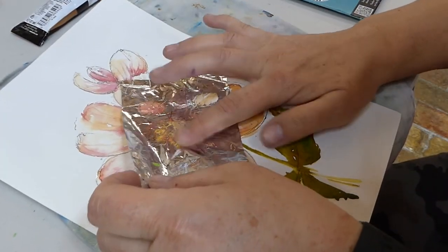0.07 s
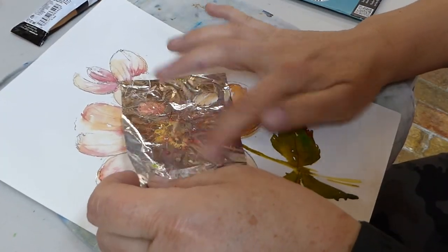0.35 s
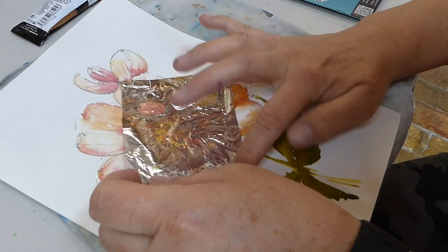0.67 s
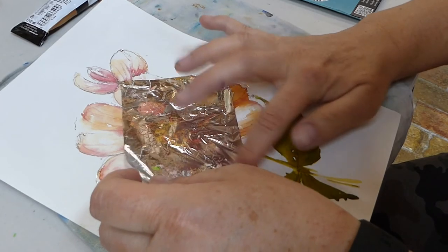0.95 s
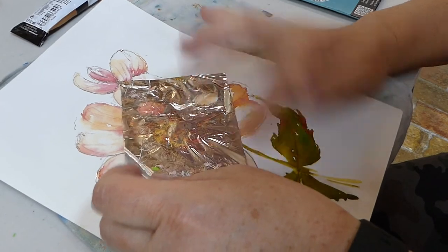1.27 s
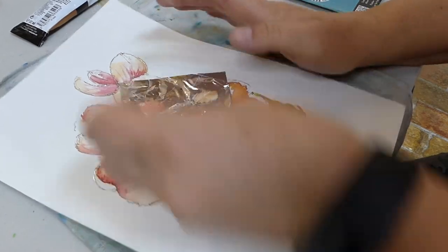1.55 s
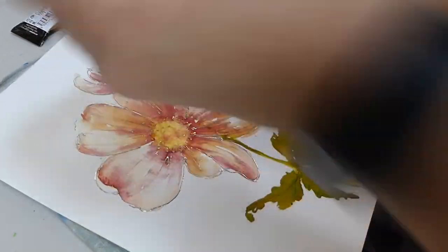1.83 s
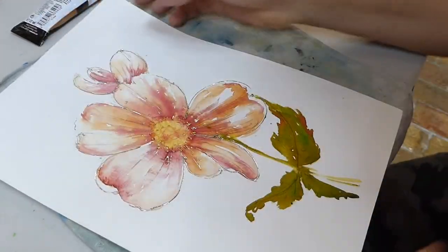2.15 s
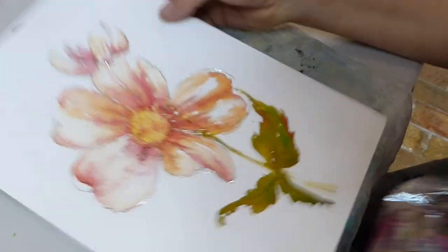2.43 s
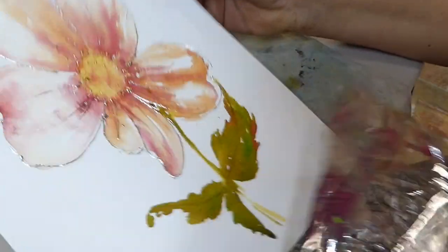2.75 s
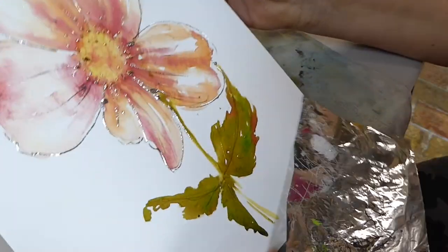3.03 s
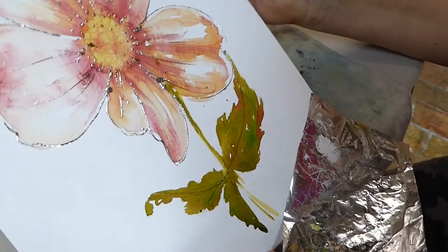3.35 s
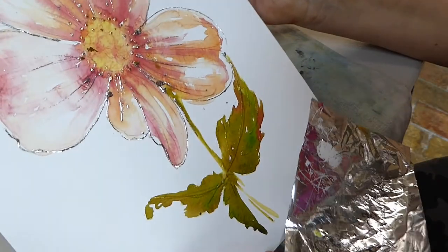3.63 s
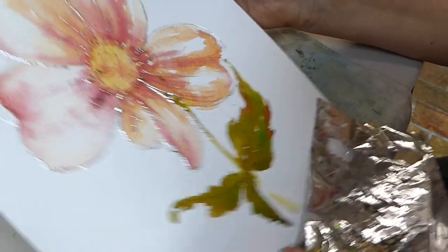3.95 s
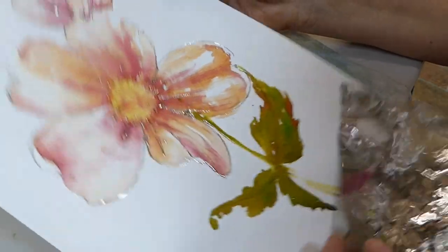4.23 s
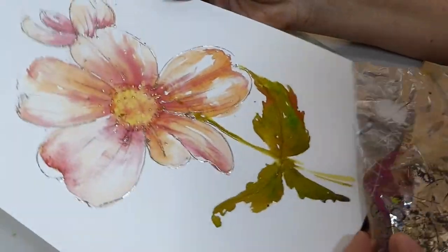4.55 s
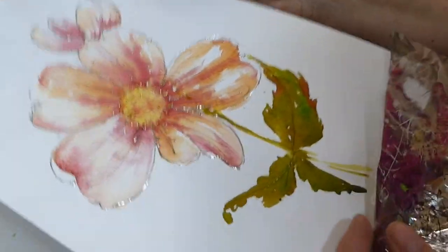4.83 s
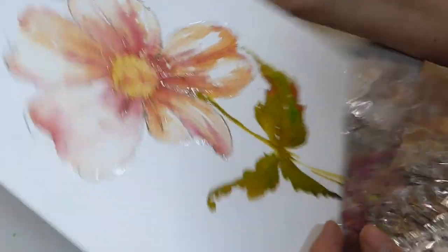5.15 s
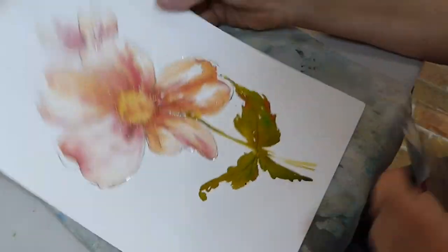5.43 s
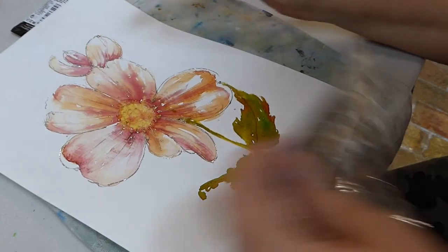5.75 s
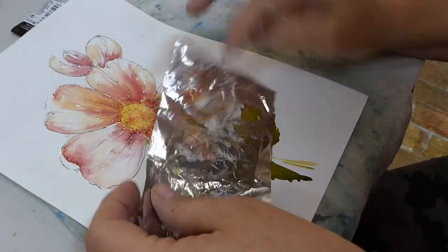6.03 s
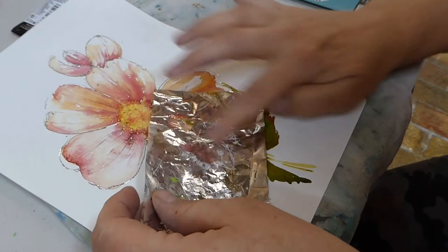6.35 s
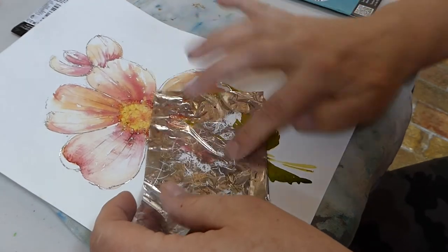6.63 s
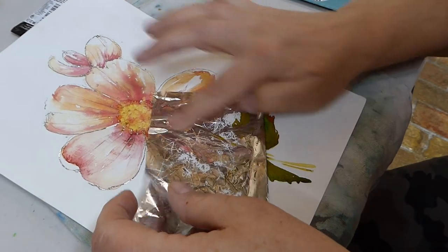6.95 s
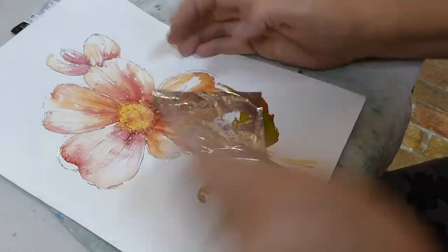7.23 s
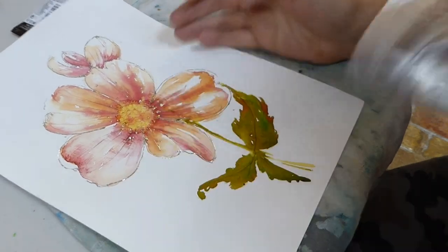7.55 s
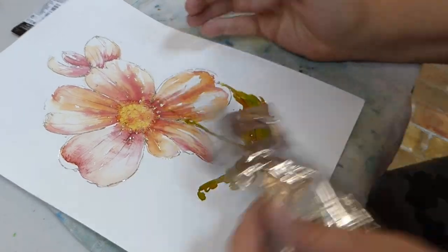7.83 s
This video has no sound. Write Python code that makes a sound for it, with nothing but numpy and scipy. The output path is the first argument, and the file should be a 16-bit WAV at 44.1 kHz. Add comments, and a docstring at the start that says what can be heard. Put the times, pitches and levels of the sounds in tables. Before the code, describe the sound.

Close to the microphone in a small quiet room, thin foil crackles in fits under a rubbing finger, then comes away in a loud, bright crinkle. Stiff paper scrapes across the desk with a few dull knocks while the held foil ticks faintly. The foil is then pressed down again, crackling, and lifted with another burst of crinkling. Occasional soft hand thumps sound on the desk.

```python
"""A fingertip presses thin metal foil onto paper, close by on a desk in a small quiet room.
The finger rubs, and the foil's creases buckle in showers of tiny clicks and a few sharp snaps.
At about 1.6 s the foil is peeled off, then held while the paper slides and knocks on the desk.
From about 5 s it is laid down and rubbed flat again, and after 7 s it is peeled off once more.
Now and then a hand bumps the desk."""
import sys
import numpy as np
from scipy import signal
from scipy.fft import rfft, irfft, next_fast_len
from scipy.io import wavfile
from scipy.ndimage import uniform_filter1d, map_coordinates

SR = 44100
rng = np.random.default_rng(int(sys.argv[2]) if len(sys.argv) > 2 else 0)


def to_wav(sig):
    """Store sig (one row per channel, or 1-D mono) as 16-bit WAV at the path in sys.argv[1].

    Samples outside -1..1 are clipped; the rate is SR.
    """
    pcm = np.clip(np.atleast_2d(sig), -1, 1) * 32767
    pcm = np.round(pcm).astype(np.int16)
    wavfile.write(sys.argv[1], SR, pcm.T)  # frames by channels


N = 352359

# Levels in all tables are relative. Fine creases make the foil's treble, broad facets its body.
# the foil peeled off or swung through the air, one table per lift: t/s, creases/dB, facets/dB
FOIL_LIFTS = [
    [(1.56, -42, -45), (1.6, -29.5, -28.5), (1.684, -24.5, -27.5), (1.795, -41, -44), (1.82, -32.5, -35),
     (1.885, -52.5, -56)],
    [(2.015, -63, -55), (2.036, -31, -31), (2.14, -32, -33), (2.18, -41.5, -47), (2.203, -37.5, -40),
     (2.23, -47.5, -52.5), (2.275, -51, -52)],
    [(7.17, -58, -58.5), (7.25, -32.5, -36), (7.273, -40, -36), (7.335, -27.5, -30), (7.53, -43, -47.5),
     (7.575, -62.5, -61)],
    [(7.61, -57.5, -59), (7.648, -47.5, -49), (7.668, -25.5, -30), (7.745, -46, -47), (7.82, -51, -57)],
]
# the foil merely held: creases/dB, facets/dB
HELD_STILL_DB = (-66.5, -63)


def foil(crinkle_db=2, snap_db=1, split_hz=6000):
    """Buckling foil crinkles and snaps: creases are heard above split_hz, facets (flat patches) below."""
    # the loudest single creases popping through: t/s, creases/dB, facets/dB
    big_snaps = [(0.1246, -31.5, -48), (0.1587, -38, -58), (0.1858, -27, -57), (0.2706, -28, -35),
                 (0.4686, -37, -59), (0.298, -38, -54), (0.372, -44.5, -55), (0.5026, -46, -54),
                 (0.574, -41, -51), (0.671, -40, -58), (0.9128, -38, -41), (0.9214, -42, -44),
                 (1.013, -39, -35), (1.0942, -37, -33), (1.1132, -38, -42.5), (1.1608, -46, -53),
                 (1.2741, -39, -38), (1.3166, -34, -40), (1.4743, -27, -32), (1.9805, -38, -35),
                 (1.3524, -24, -36), (1.501, -34, -36), (1.5695, -29, -30), (1.5948, -23, -17),
                 (1.709, -25, -28), (1.7586, -29.5, -24.5), (1.9407, -49, -36.5), (1.9872, -19.5, -21),
                 (2.2887, -42, -39), (2.8296, -40, -40), (3.013, -47.5, -51), (3.166, -46, -58),
                 (3.209, -42.5, -47), (3.2307, -51, -46.5), (3.6027, -43, -52), (3.66, -53, -60),
                 (4.3915, -43, -54), (4.7525, -34.5, -38), (4.9332, -36, -31), (5.0968, -56, -48),
                 (5.1942, -35.5, -40), (5.2549, -36.5, -40), (5.3248, -32, -35), (5.708, -38, -56),
                 (5.779, -41, -56), (5.8142, -45, -38), (5.863, -42, -40), (5.9313, -29, -42),
                 (6.1248, -36.5, -40), (6.194, -38.5, -49.5), (6.2567, -31, -35), (6.3669, -41, -47.5),
                 (6.5033, -34.5, -53), (6.5284, -32, -39.5), (6.9519, -34.5, -46), (6.998, -41, -56),
                 (7.174, -56, -41.5), (7.2783, -26, -34), (7.3461, -25, -23), (7.432, -30, -36),
                 (7.7259, -26, -30.5), (7.9385, -35, -47), (7.9606, -27, -49)]
    # the foil's tone colour: f/Hz, level/dB
    colour = [(40, -29), (90, -19.5), (170, -10), (400, -5.5), (750, -3), (1200, -3.5), (1700, -4),
              (3300, -1), (5500, -3), (7800, -6.5), (9600, -2), (12500, -6.5), (15300, -11), (16500, -37)]
    flex_db = flexing()
    start_s, *levels_db = np.vstack([big_snaps, small_snaps(flex_db)]).T
    pops = buckles(len(start_s), crack_t60=.005, shiver=.24, shiver_t60=.022, ring=.3, ring_t60=.003)
    pops *= np.sqrt(.004 * SR)  # as much energy as 4 ms at level 1
    snaps = np.array([placed(start_s * SR, amp(db + snap_db)[:, None] * pops) for db in levels_db])
    snaps = filtered(snaps, lambda hz: 1j * hz / (700 + 1j * hz))  # a small facet gives little bass
    fine, broad = amp(flex_db + crinkle_db) * crinkling(flex_db[0]) + snaps
    blend = fine + filtered(broad - fine, lambda hz: 1 / (1 + (hz / split_hz) ** 4))
    return coloured(blend, colour)


def flexing(fits_db=1.5, fits_rate=45, bend_edge_db=11, tug_attack_s=0.013):
    """How hard the foil is worked, in dB for creases and facets; under a finger it gives way in fits."""
    # slow bends that swell and relax: middle/s, length/s, creases/dB, facets/dB
    bends = [(0.053, .12, -42.5, -49.5), (0.224, 0.13, -37.5, -40), (0.402, 0.08, -45, -51),
             (0.525, 0.23, -54.5, -56), (0.629, .12, -42.5, -41), (0.815, 0.087, -44, -44),
             (1.004, 0.11, -45.5, -45), (1.098, 0.15, -55, -51), (1.399, 0.096, -38, -38.5),
             (1.463, 0.06, -34, -36), (1.528, 0.074, -44, -43), (1.983, 0.032, -37, -35.5),
             (2.495, .11, -38.5, -43), (4.276, 0.13, -58.5, -56.5), (4.685, .15, -59.5, -61),
             (5.276, .2, -54, -48.5), (5.553, 0.2, -43.5, -45), (5.848, .2, -55.5, -52),
             (6.027, 0.16, -43, -42.5), (6.248, .4, -57, -56), (6.438, 0.14, -44.5, -48.5),
             (6.525, 0.057, -50.5, -53), (6.627, 0.13, -46.5, -48.5), (6.853, 0.22, -49.5, -55),
             (7.06, 0.17, -49, -51), (7.851, 0.1, -48.5, -53), (7.97, 0.14, -41.5, -47)]
    # sudden tugs that die away: t/s, time to fall 20 dB/s, creases/dB, facets/dB
    tugs = [(1.234, 0.2, -47.5, -52.5), (1.299, 0.43, -45, -46.5), (2.279, 0.21, -38.5, -38.5),
            (2.584, 0.13, -40, -40), (2.7, 0.2, -46.5, -44), (2.879, 0.06, -46.5, -45.5),
            (2.954, 0.07, -46.5, -44.5), (3.067, 0.09, -50, -52.5), (4.278, 0.27, -52.5, -51),
            (4.355, 0.13, -54, -56), (4.524, 0.13, -45, -46.5), (4.747, 0.03, -45.5, -43.5),
            (4.93, 0.1, -60, -60.5), (5.165, 0.7, -53.5, -54), (5.316, 0.11, -36, -39),
            (5.652, 0.12, -46.5, -44), (5.745, 0.4, -54, -51), (5.908, 0.19, -38.5, -42),
            (6.222, 0.16, -46.5, -54), (6.32, 0.05, -43.5, -45)]
    t = control_times()
    shapes = [amp(-bend_edge_db * np.minimum((2 * (t - s) / length) ** 2, 20)) for s, length, *_ in bends]
    shapes += [push(t, s, tug_attack_s, 0, fall) for s, fall, *_ in tugs]
    gains = amp(np.vstack([bends, tugs])[:, 2:]).T
    fingers = curves(np.vstack([t, gains ** 2 @ np.square(shapes)]).T)
    fingers *= amp(fits_db * wobble(fits_rate)) ** 2
    lifts = sum(gesture(rows) for rows in FOIL_LIFTS) ** 2
    return 10 * np.log10(fingers + lifts + amp(HELD_STILL_DB)[:, None] ** 2)


def crinkling(flex_db):
    """Harder flexing buckles more creases a second; foil held almost still mostly scuffs."""
    rate = np.minimum(950 * amp(.65 * (flex_db + 45) + 4 * wobble(70)), 5000)
    creases = shower(rate, spread_db=4.5)
    worked, scuff = np.clip((flex_db + 70) / 14, .2, 1), .55
    return unit((worked * creases + scuff * rng.standard_normal(N)) / np.hypot(worked, scuff))


def shower(rate, spread_db, kinds=300):
    """Creases give way at random, about rate times a second: most are tiny, a few large."""
    shapes = buckles(kinds, crack_t60=.002, shiver=.18, shiver_t60=.016, ring=.5, ring_t60=.003)
    chance, strength, kind = rng.random(N), rng.exponential(size=N), rng.integers(kinds, size=N)
    starts = np.flatnonzero(chance < rate / SR)
    sizes = amp(spread_db * np.minimum(strength[starts], 3.2))
    clicks = placed(starts, sizes[:, None] * shapes[kind[starts]])
    # the creases share out the work that the hand puts in
    power = np.abs(uniform_filter1d(clicks ** 2, size=1500))
    return clicks / np.sqrt(power + 0.22 * rate / SR)


def buckles(count, crack_t60, shiver, shiver_t60, ring, ring_t60, size=400):
    """One click per row: a crack, a shiver of the sheet and the ring of the freed facet."""
    t = np.arange(size) / SR
    ring_hz = rng.uniform(1200, 14000, (count, 1))
    noise = rng.standard_normal((count, size))
    # a t60 is the time in seconds to fade by 60 dB
    crack = unit(noise * (amp(-60 * t / crack_t60) + shiver * amp(-60 * t / shiver_t60)))
    facet = unit(np.sin(2 * np.pi * ring_hz * t) * amp(-60 * t / ring_t60))
    return unit(crack + ring * facet) / np.sqrt(size)


def small_snaps(flex_db, rate=14, over_db=(8, 1), spread_db=2.5, ceiling_db=-43, count=200):
    """Lesser creases pop at random while the foil moves; gives rows of t/s, creases/dB, facets/dB."""
    when, chance = rng.random((count, 2)).T
    crinkle_db = flex_db[:, (when * N).astype(int)].T
    levels_db = np.minimum(crinkle_db + over_db, ceiling_db) + spread_db * rng.standard_normal((count, 2))
    popped = (crinkle_db[:, 0] > HELD_STILL_DB[0] + 1) & (chance < rate * N / SR / count)
    return np.column_stack([when * N / SR, np.where(popped[:, None], levels_db, -np.inf)])


def bending_waves(x, lag_s=0.000395):
    """Low tones travel through the foil more slowly and arrive later (by lag_s at 4 kHz)."""
    return filtered(x, lambda hz: np.exp(-4j * np.pi * lag_s * np.sqrt(4000 * hz)))


def changing_shape(x, depth_db=2.1):
    """The foil keeps changing shape, so the tones it favours come and go."""
    bands = signal.stft(x, nperseg=256)[2]
    ripple = uniform_filter1d(rng.standard_normal(bands.shape), size=2, axis=0)  # smooth over pitch
    ripple = uniform_filter1d(ripple, size=16, axis=1)  # and over time
    return signal.istft(bands * unit(amp(depth_db * unit(ripple))), nperseg=256)[1][:N]


def flapping(level_db=-3, rate=700):
    """Swung through the air, the whole foil buckles with a lower rattle that follows its facets."""
    # the rattle's tone colour: f/Hz, level/dB
    colour = [(50, -37), (110, -23), (200, -25), (350, -8), (500, -7), (780, 3), (1100, -6.5),
              (2500, -55.5)]
    # the rattle against the facets, one value per lift: level/dB
    lift_db = [-17.5, -7.5, -16, -11]
    rattle = unit(coloured(shower(rate, spread_db=5.0), colour))
    swing = sum(amp(db) * gesture(rows)[1] for db, rows in zip(lift_db, FOIL_LIFTS))
    return amp(level_db) * swing * rattle


def fingertip(drone_db=1, skin_db=-2, attack_s=0.021, fall_s=0.087):
    """Each stroke rubs the foil flat and makes the desk under it drone."""
    # finger strokes: t/s, held for/s, desk drone/dB, skin rub/dB
    strokes = [(-0.01, 0.059, -48, -48.5), (0.371, 0.082, -50.5, -44.5), (0.81, 0.043, -53, -47),
               (0.95, .06, -62, -52), (6.41, .08, -47, -49), (6.604, 0.036, -51, -45),
               (6.763, 0.068, -53, -46.5), (6.845, 0.1, -48, -54), (7.04, .05, -60, -53)]
    # tone colours of the desk and the skin: f/Hz, level/dB
    drone_colour = [(60, -28.5), (150, -14), (240, -2.5), (400, -6), (600, -22), (1500, -32)]
    skin_colour = [(200, -46), (480, -4), (650, -3.5), (900, -6), (1250, -16.5), (4000, -15.5),
                   (12000, -76)]
    t = control_times()
    gains = sum(np.outer(amp(db), push(t, s, attack_s, hold, fall_s)) for s, hold, *db in strokes)
    drone_gain, skin_gain = curves(np.vstack([t, gains]).T)
    judder = friction(drone_colour, slip_rate=90, rough_db=3)
    rub = friction(skin_colour, slip_rate=160, rough_db=3)
    return amp(drone_db) * drone_gain * judder + amp(skin_db) * skin_gain * rub


def sliding_paper(level_db=-3, hollow_db=8, width_octaves=.36, attack_s=0.028):
    """Paper scrapes over the desk; the air gap under it rings with a gliding, hollow tone."""
    # nudges after which the paper slows down: t/s, time to fall 20 dB/s, level/dB
    slides = [(2.35, 0.76, -45), (2.47, 0.4, -40.5), (2.6, 1.35, -49), (3.34, 2.2, -63.5), (4.27, 1, -51),
              (4.52, 0.5, -48), (5.14, 0.95, -46), (5.3, 0.1, -45.5), (5.515, 0.24, -43), (7.3, 0.1, -37)]
    # the scrape's tone colour: f/Hz, level/dB
    colour = [(60, -31), (200, -1), (700, -1.5), (1500, -2.5), (2400, -6), (3700, -2.5), (6000, -11.5),
              (15000, -32)]
    # the air gap's tone: t/s, f/Hz
    gap_tone = [(2.4, 2000), (2.5, 1580), (2.58, 910), (2.74, 1090), (2.82, 710), (3.3, 755), (3.33, 2420),
                (3.8, 2480), (4.25, 835), (5.3, 770), (5.62, 2010), (7.33, 2000), (7.45, 1160)]
    hz, frame_s, bands = signal.stft(friction(colour, slip_rate=130, rough_db=2.0), SR, nperseg=512)
    octaves_away = np.log2((hz[:, None] + 1) / np.interp(frame_s, *np.transpose(gap_tone)))
    hollow = amp(hollow_db * np.exp(-(octaves_away / width_octaves) ** 2))
    scrape = signal.istft(bands * hollow, SR, nperseg=512)[1][:N]
    t = control_times()
    power = sum((amp(db) * push(t, start, attack_s, 0, fall)) ** 2 for start, fall, db in slides)
    speed, = curves(np.column_stack([t, np.sqrt(power)]))
    return amp(level_db) * speed * unit(scrape)


def friction(colour, slip_rate, rough_db):
    """Surfaces stick and slip unevenly, making a rough noise."""
    return unit(coloured(rng.standard_normal(N) * amp(rough_db * wobble(slip_rate)), colour))


def paper_knocks(level_db=-7, t60=0.064):
    """Stiff paper hits the desk with a short, dull knock and no ring."""
    # knocks: t/s, level/dB
    hits = [(1.596, -39), (1.827, -28), (2.459, -33.5), (2.526, -33), (2.536, -26.5), (2.792, -34.5),
            (5.155, -39.5), (5.214, -44), (5.542, -32), (7.677, -31), (7.725, -36)]
    # their tone colour: f/Hz, level/dB
    colour = [(80, -23), (300, 2), (700, 7), (1300, 0.5), (2200, -15), (6000, -40)]
    t = np.arange(SR // 8) / SR
    start_s, db = np.transpose(hits)
    bursts = rng.standard_normal((len(hits), len(t))) * amp(-60 * t / t60)
    return coloured(placed(start_s * SR, amp(db + level_db)[:, None] * bursts), colour)


def hand_bumps(level_db=-5, attack_s=0.0073):
    """A soft hand sets the desk's lowest tones ringing."""
    # hands landing: t/s, level/dB
    hits = [(0.392, -42), (1.336, -35.5), (1.586, -50), (2.059, -51), (2.274, -39), (2.526, -47),
            (5.543, -47), (7.261, -32), (7.272, -42), (7.289, -48)]
    # the desk's own tones: f/Hz, level/dB, t60/s
    desk_tones = [(113, -6.5, 0.19), (165.5, -3, 0.12), (244, -4, 0.078)]
    t = np.arange(SR // 4) / SR
    start_s, db = np.transpose(hits)
    ring = 0
    for hz, tone_db, t60 in desk_tones:
        struck_db = tone_db + 2 * rng.standard_normal((len(hits), 1))
        ring += amp(struck_db - 60 * t / t60) * np.sin(2 * np.pi * hz * t)
    return placed(start_s * SR, amp(db + level_db)[:, None] * ring * (1 - np.exp(-t / attack_s)))


def paper_squeak(level_db=0):
    """The rubbing paper catches briefly and squeaks faintly in a few narrow tones."""
    # the squeak's rise and fall: t/s, level/dB
    swell = [(3.89, -67), (3.95, -53.5), (4.0, -59), (4.05, -59.5)]
    # its tones: f/Hz, width/Hz, level/dB
    tones = [(662, 60, 5), (3570, 400, -2), (5170, 260, -4)]
    peaks = lambda hz: sum(amp(db) * 1j * hz * width / (centre ** 2 - hz ** 2 + 1j * hz * width)
                           for centre, width, db in tones)
    return amp(level_db) * gesture(swell)[0] * unit(filtered(rng.standard_normal(N), peaks))


def desk_echo(x, delay_s=0.000542, drift=0.23, strength=.22):
    """The desk reflects the foil's sound; the delay wanders as the hand lifts and lowers the foil."""
    delay = delay_s * SR * np.exp(drift * wobble(4))
    echo = map_coordinates(x, [np.arange(N) - delay], order=3)
    return (x + strength * echo) / np.hypot(1, strength)


def near_scatter(x, level_db=-9, shift_rate=6, count=2, t60=.016):
    """Hands and things on the desk scatter the higher tones, along paths that shift as the hands move."""
    t = np.arange(SR // 20) / SR
    decay = (t > .001) * amp(-60 * t / t60)
    echoes = unit(rng.standard_normal((count, len(t))) * decay) / np.sqrt(len(t))
    shares = np.array([wobble(shift_rate) for _ in echoes])
    paths = signal.oaconvolve(np.tile(x, (count, 1)), echoes, axes=1)[:, :N]
    side = (shares * paths).sum(axis=0) / np.linalg.norm(shares, axis=0)
    side = filtered(side, lambda hz: 1j * hz / (500 + 1j * hz))  # thin out the bass
    return amp(level_db) * np.array([side, -side])


def wall_echoes(x, level_db=-12, delay_s=0.0048, places=24):
    """The walls answer a little later, differently left and right and for each place of the hands."""
    # how long the room rings: f/Hz, t60/s
    ring_times = [(200, 1), (3000, 0.5), (14000, 0.22)]
    hz, frame_s, bands = signal.stft(rng.standard_normal((places, 2, SR // 3)), SR, nperseg=256)
    tails = signal.istft(bands * amp(-60 * frame_s / along(ring_times, hz)[:, None]), SR, nperseg=256)[1]
    t = np.arange(tails.shape[-1]) / SR
    tails = unit(tails * (1 - np.exp(-(t / delay_s) ** 2))) / np.sqrt(len(t))
    echoes = np.zeros((2, N + len(t)))
    for part, tail in zip(np.array_split(np.arange(N), places), tails):
        answer = signal.fftconvolve(x[None, part], tail, axes=1)
        echoes[:, part[0]:part[0] + answer.shape[1]] += answer
    return amp(level_db) * echoes[:, :N]


def room_hush(level_db=-58):
    """The steady hush of the room, much the same left and right in the bass."""
    # the hush's tone colour: f/Hz, level/dB
    colour = [(15, -60), (25, -23), (64, -24), (111, -8.5), (149, -9.5), (263, -6), (394, -7), (695, -11.5),
              (1020, -10), (1700, -19), (2410, -21), (2610, -27), (13200, -54), (16000, -48)]
    # left against right: f/Hz, likeness (1 the same, -1 opposite)
    likeness = [(60, 0.51), (150, 0.85), (380, 0.52), (950, -0.53), (2380, -0.92), (5980, 1), (15000, 0.94)]
    angle = lambda hz: np.arccos(np.clip(along(likeness, hz), -1, 1)) / 2
    gains = lambda hz: amp(along(colour, hz)) * [np.cos(angle(hz)), np.sin(angle(hz))]
    mid, side = filtered(rng.standard_normal((2, N)), gains)
    return amp(level_db) * unit(np.array([mid + side, mid - side]))


def amp(db):
    """Decibels to gain."""
    return 10 ** (np.asarray(db) / 20)


def unit(x):
    """Each row scaled to an average power of 1."""
    return x / np.sqrt(np.mean(x ** 2, axis=-1, keepdims=True) + 1e-20)


def along(points, hz):
    """Rows of (f/Hz, value) read at hz, with octaves evenly spaced."""
    f, values = np.transpose(points)
    return np.interp(np.log(hz + 1), np.log(f), values)


def control_times():
    """A millisecond grid, fine enough for the hands' movements."""
    return np.arange(0, N / SR, .001)


def curves(rows):
    """One value per sample for each column after the time."""
    times, *columns = np.transpose(rows)
    return np.array([np.interp(np.arange(N) / SR, times, column) for column in columns])


def gesture(rows, fade_s=0.011):
    """Gains from a movement's dB columns, fading to silence outside its span."""
    t = np.arange(N) / SR
    return amp(curves(rows)) * np.clip(1 + np.minimum(t - rows[0][0], rows[-1][0] - t) / fade_s, 0, 1)


def push(t, start_s, attack_s, hold_s, fall_s):
    """A gain that rises, stays up until hold_s after its start, then falls 20 dB every fall_s."""
    age = t - start_s
    return np.clip(age / attack_s, 0, 1) * amp(-20 * np.maximum(age - max(hold_s, attack_s), 0) / fall_s)


def wobble(rate):
    """A smooth curve through rate random points a second."""
    return map_coordinates(rng.standard_normal(int(N * rate / SR) + 4), [np.arange(N) * rate / SR])


def filtered(x, response):
    """x with each frequency multiplied by response(hz)."""
    size = next_fast_len(N + SR // 2)
    return irfft(rfft(x, size) * response(np.fft.rfftfreq(size, 1 / SR)), size)[..., :N]


def coloured(x, colour, size=4096):
    """x given a tone colour by a filter that keeps the power of white noise."""
    cepstrum = irfft(np.log(amp(along(colour, np.fft.rfftfreq(size, 1 / SR)))))
    # fold it so that the filter rings only after a click, never before
    cepstrum[1:size // 2] *= 2
    cepstrum[size // 2 + 1:] = 0
    pulse = irfft(np.exp(rfft(cepstrum)))
    return signal.fftconvolve(x, pulse / np.linalg.norm(pulse))[:N]


def placed(starts, waves):
    """Rows of waves added up at their starting samples."""
    at = np.maximum(starts, 0).astype(int)[:, None] + np.arange(waves.shape[1])
    return np.bincount(at.ravel(), waves.ravel(), N)[:N]


def scene():
    """The crinkling foil moves between left and right; its rattle and the desk sounds stay central."""
    # where the foil is: t/s, left minus right/dB
    foil_place = [(0.0, 0.5), (1.76, 1.0), (2.25, -7), (2.47, -1), (4.07, -1.5), (4.21, -3), (4.92, -4.5),
                  (6.52, 1.0), (7.41, 0.0), (7.7, -4), (7.99, 2.5)]
    sheet = desk_echo(changing_shape(bending_waves(foil())))
    middle = flapping() + fingertip() + sliding_paper() + paper_squeak() + paper_knocks() + hand_bumps()
    pan = amp(np.array([[.5], [-.5]]) * curves(foil_place))
    return pan * sheet + middle + near_scatter(sheet + middle) + wall_echoes(sheet + middle) + room_hush()


def record(dry, top_hz=15900):
    """The treble is cut off steeply above top_hz."""
    return filtered(dry, lambda hz: 1 / np.sqrt(1 + (hz / top_hz) ** 160))


dry = scene()
out = record(dry)
to_wav(out)
```